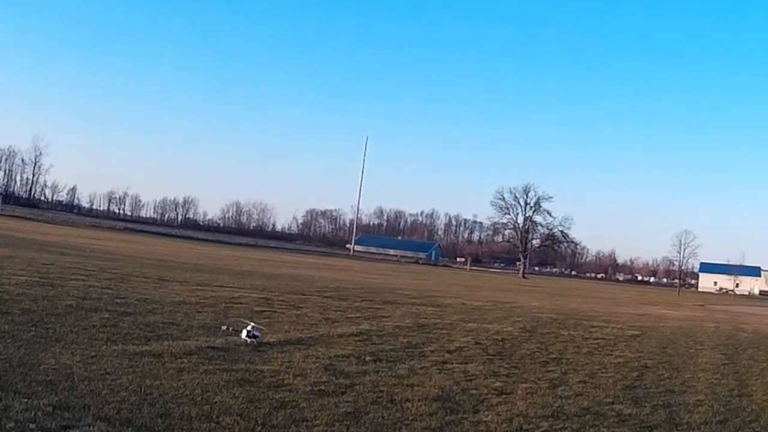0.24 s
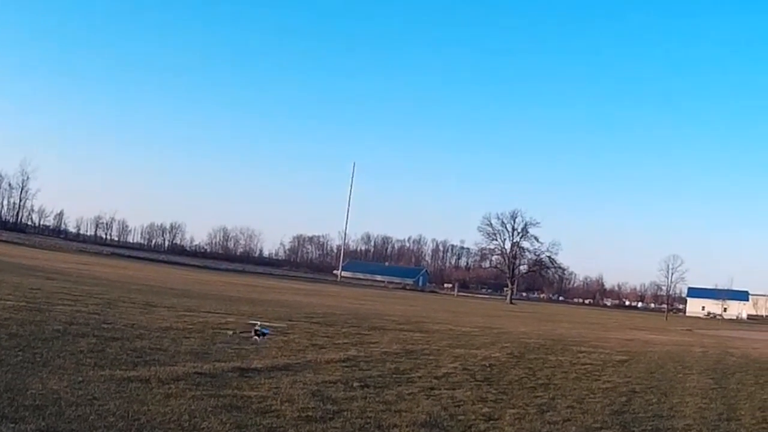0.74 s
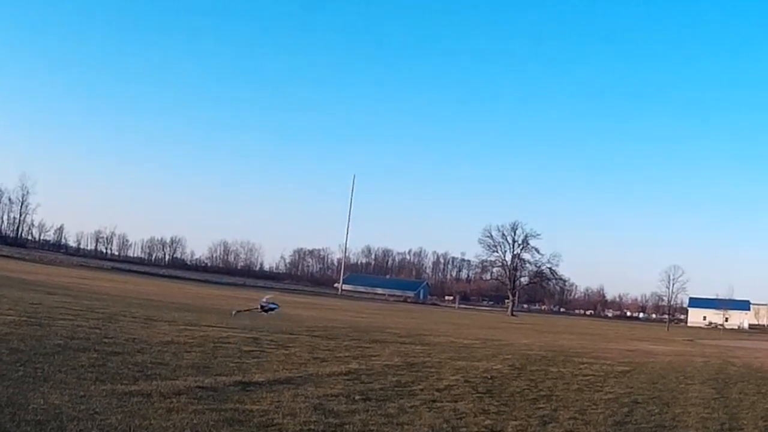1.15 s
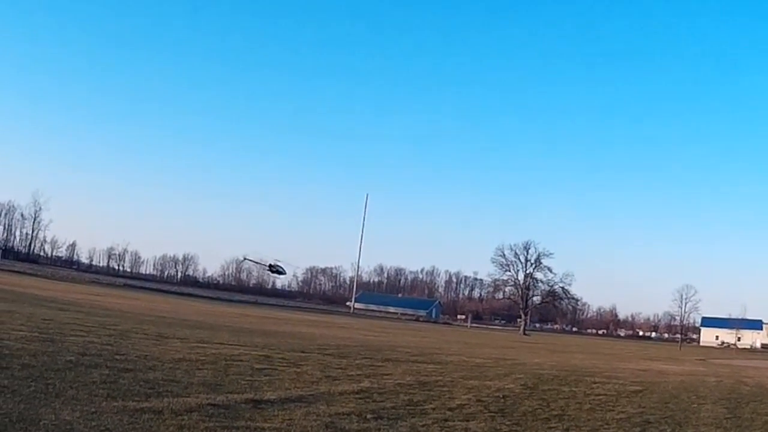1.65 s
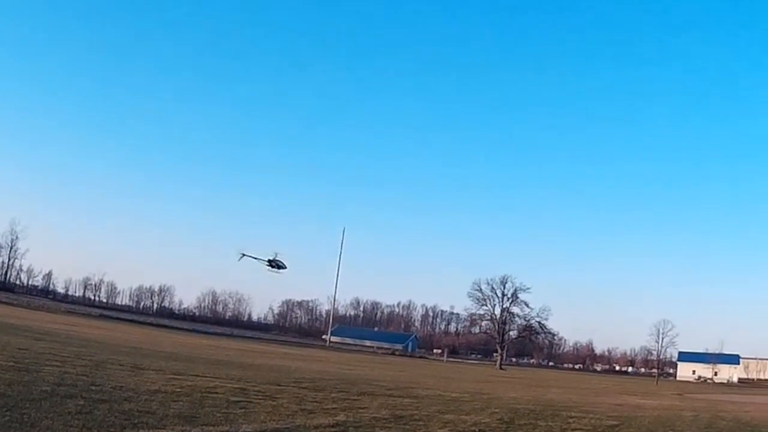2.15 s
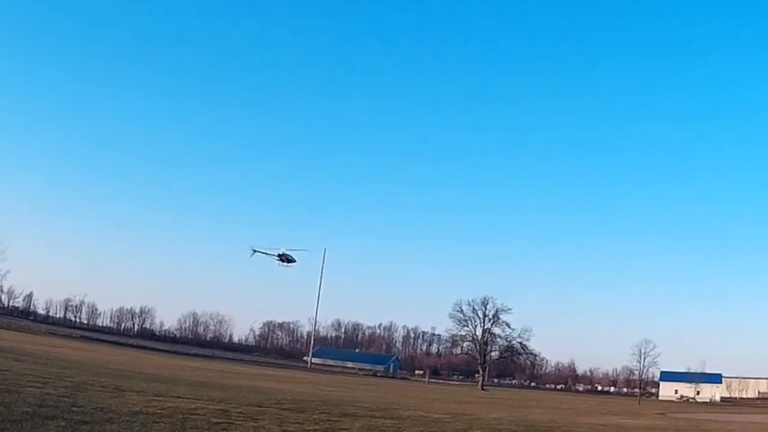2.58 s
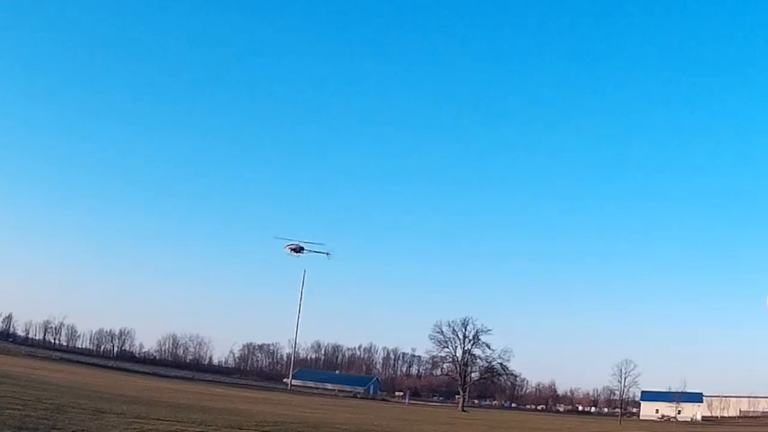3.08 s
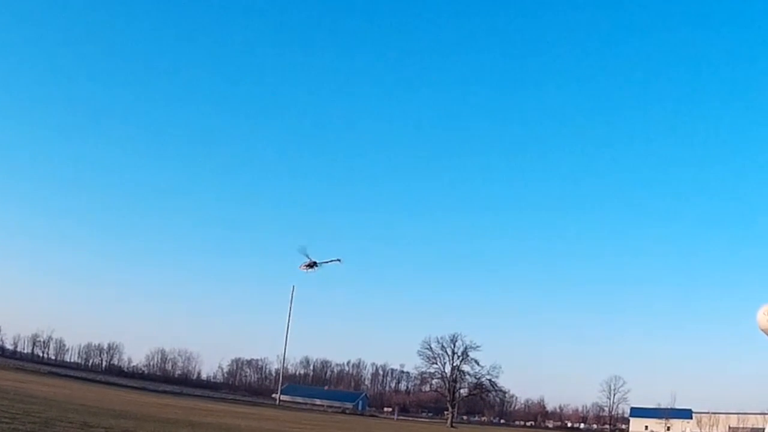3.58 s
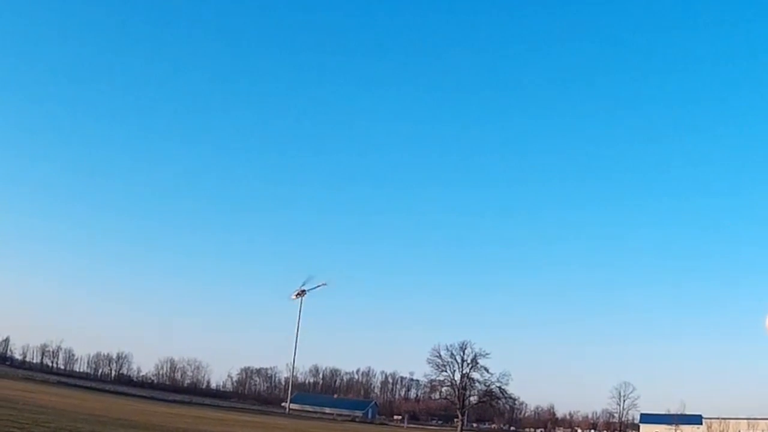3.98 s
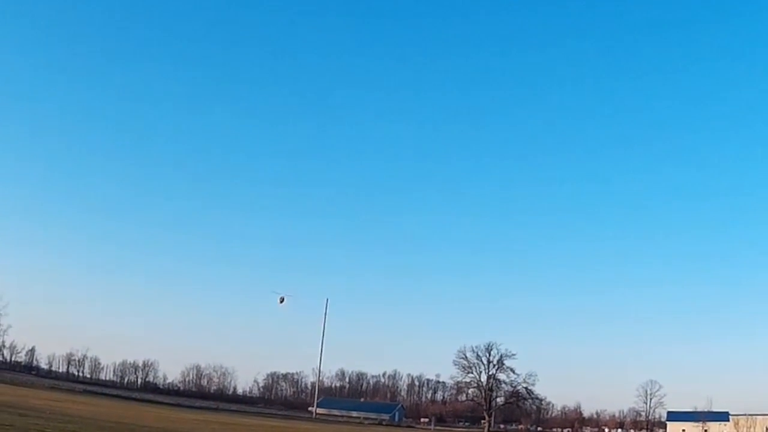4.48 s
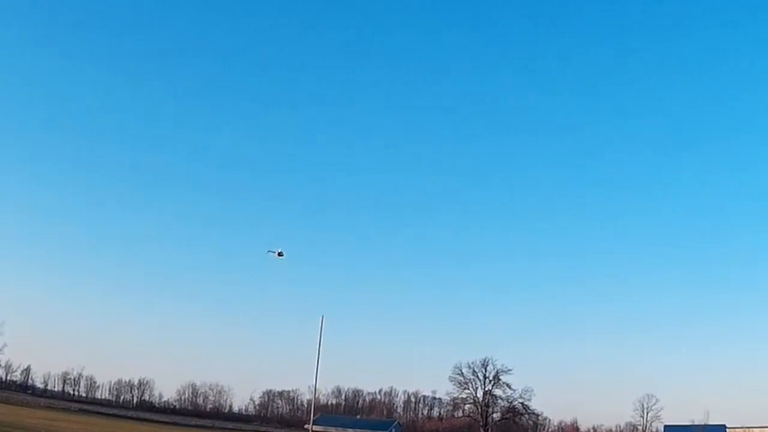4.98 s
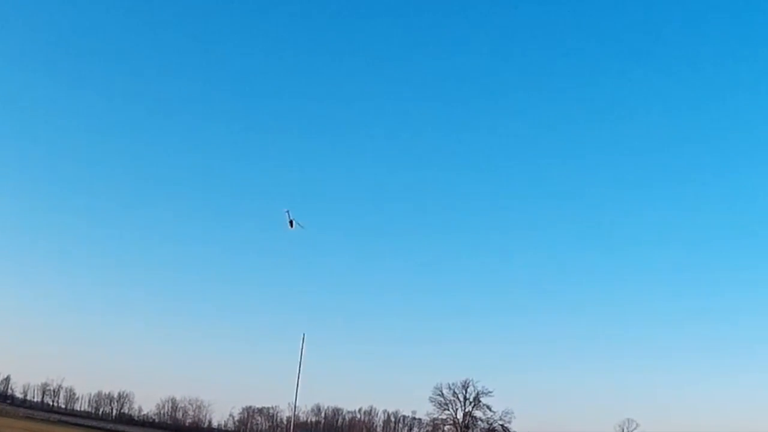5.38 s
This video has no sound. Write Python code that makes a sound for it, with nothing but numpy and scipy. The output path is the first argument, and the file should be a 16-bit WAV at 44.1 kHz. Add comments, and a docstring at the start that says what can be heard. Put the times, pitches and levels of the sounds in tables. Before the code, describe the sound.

Outdoors in an open field, a small electric model helicopter whines at a nearly steady mid pitch with fluttering blade buzz and gear sizzle. Its tone sweeps hollowly as it climbs. Around three seconds the pitch sags briefly with a harsh tail rasp, then recovers, swells in a bank and fades away. Light wind rumbles on a handheld camera microphone.

```python
"""Electric model helicopter over grass

A small electric helicopter lifts off a grass field, climbs, pirouettes and flies away.
One rotor shaft times it all: a whining drive, thrumming blades that chop whine and air, a humming tail, gears.
The tail rotor rasps when it pushes hard. A delayed ground bounce with a moving lag sweeps a comb through the sound.
Wind noise buffets the microphone, the field rushes faintly and the camera adds a thin whistle."""
import sys
import numpy as np
from scipy import signal
from scipy.fft import rfft, irfft
from scipy.io import wavfile
from scipy.ndimage import uniform_filter1d

SR = 44100
rng = np.random.default_rng(int(sys.argv[2]) if len(sys.argv) > 2 else 0)


def pcm_store(signal):
    """Save signal as 16-bit PCM."""
    levels = np.round(np.clip(np.atleast_2d(signal), -1, 1) * 32767)
    wavfile.write(sys.argv[1], SR, levels.astype(np.int16).T)


N = 248267
T = np.arange(N) / SR
WHINE_PER_TURN = 25  # whine cycles per turn of the main rotor

# aim of the sound as the body turns: (time [s], whine level [dB], gear level [dB])
FACING = [(0, 2, 1), (1.1, -.5, 0.5), (1.75, -2.5, 5.5), (2.4, -0.5, 5), (2.76, 1.5, 6), (2.89, -1.5, 3),
          (2.99, -12, -2), (3.08, -1.5, -3), (3.28, 0, 5), (3.6, -1, 7.5), (4.05, -1, 5), (4.3, 2.5, -1.5),
          (4.68, -2.5, 4.5), (5.0, -0.5, -1), (5.63, 0, 1.5)]


def undb(db):
    """Decibels to gain."""
    return 10 ** (np.asarray(db) / 20)


def curves(table):
    """Each column of a table, joined by straight lines in time."""
    time_s, *columns = np.transpose(table)
    return [np.interp(T, time_s, column) for column in columns]


def walk(rate_hz):
    """Smooth random motion of unit spread: noise rolled off steeply above rate_hz."""
    f = np.fft.rfftfreq(N, 1 / SR)
    x = irfft(rfft(rng.standard_normal(N)) / (1 + (f / rate_hz) ** 4), N)
    return x / x.std()


def noise(colour):
    """Noise of unit rms, its spectrum joined in dB over log frequency."""
    hz, db = np.transpose(colour)
    f = np.fft.rfftfreq(N, 1 / SR) + 1
    gain = undb(np.interp(np.log(f), np.log(hz), db))
    ends = np.minimum(f / hz[0], 1) ** 2 * np.minimum(hz[-1] / f, 1) ** 2
    x = irfft(rfft(rng.standard_normal(N)) * gain * ends, N)
    return x / x.std()


def swell(at_s, half_s, order=2):
    """A rise from 0 to 1 and back around a moment; higher orders hold the top."""
    return np.exp(-np.abs((T - at_s) / half_s) ** order)


def bank():
    """How far the rotor disc is tipped towards the listener, 0-1."""
    # banked turns: (middle [s], half length [s], depth [0-1])
    banks = [(3.614, 0.53, 1), (4.294, 0.16, 0.3), (5.3, 0.3, 0.23)]
    return sum(depth * swell(at_s, half_s, order=6) for at_s, half_s, depth in banks)


def lines(angle, table, waver_db, waver_hz):
    """Partials locked to a shaft, each wavering in level on its own."""
    out = 0
    for order, db in table:
        gain = undb(db + waver_db * walk(waver_hz))
        out = out + gain * np.cos(order * angle + rng.uniform(0, 2 * np.pi))
    return np.sqrt(2) * out


def chop(turn, depth):
    """A swell each time one of the two main blades passes; unit rms."""
    gate = np.exp(depth * (np.cos(turn) ** 2) ** 3)
    return gate / np.sqrt(np.mean(gate ** 2))


def over_grass(x, bounce, dull_hz):
    """Direct sound plus its later bounce off the ground, which swallows the treble."""
    # grows with height, shrinks with distance: (time [s], lag of the bounce [ms])
    ground_lag = [(0.0, 1.09), (0.5, 1.177), (1.0, 1.43), (1.5, 2.01), (2.0, 2.57), (2.5, 2.886),
                  (3.0, 3.044), (3.4, 3.176), (3.75, 2.99), (4.1, 2.854), (4.6, 2.62), (5.0, 2.95),
                  (5.3, 3.4), (5.63, 3.85)]
    lag_ms, = curves(ground_lag)
    soft = signal.sosfiltfilt(signal.butter(1, dull_hz, fs=SR, output="sos"), x)
    echo = np.interp(T - lag_ms / 1000, T, soft, left=0)
    return (x + bounce * echo) / np.sqrt(1 + bounce ** 2 / 2)


def whistle(sound, shut_db, open_db, depth_db):
    """The camera's electronic whistle, held down by its noise suppressor when the sound is quiet."""
    whistle_hz, flip_hz = 9515.5, 36.5
    level_db = 10 * np.log10(uniform_filter1d(sound ** 2, SR // 20) + 1e-12)
    shut = np.clip((open_db - level_db) / (open_db - shut_db), 0, 1)
    # the phase flips to and fro, which splits the even tone into a comb
    flip = np.tanh(12 * np.sin(2 * np.pi * flip_hz * T))
    return np.cos(2 * np.pi * whistle_hz * T + 1.4 * flip) * undb(-depth_db * shut)


def field():
    """Faint, far-off rush of the open field with a smooth hiss: coloured noise, barely wavering."""
    # far-off rush: (frequency [Hz], level [dB per Hz])
    field_colour = [(60, -28), (220, 8.5), (300, 10.5), (700, 10.5), (1500, -9.5), (3000, -16.5),
                    (6000, -34), (13000, -21.5), (14400, -20)]
    return undb(-63 + 0.29 * walk(2.7)) * noise(field_colour)


def breeze():
    """Low buffeting of the microphone: a light wind that swells and dies down, with short gusts."""
    # wind rumble: (frequency [Hz], level [dB per Hz])
    wind_colour = [(15, -25), (30, 2.5), (55, 2), (100, -0.5), (150, -6), (230, -13.5), (500, -18.5),
                   (1500, -60)]
    # gusts on the microphone: (time [s], peak level [dB])
    gust_peaks = [(.67, -53), (.85, -51), (1.04, -52), (1.14, -53), (1.68, -51), (1.88, -50.5), (2.13, -67),
                  (2.33, -68), (2.55, -54), (4.42, -59), (4.55, -67)]
    gust_half_s = 0.034
    light = undb(-65.5 + 7.5 * swell(at_s=1.8, half_s=1.6) + 2.6 * walk(9.4))
    gusts = sum(undb(db) * swell(at_s, gust_half_s) for at_s, db in gust_peaks)
    return np.hypot(light, gusts) * noise(wind_colour)


def gears(turn, hiss_db):
    """Tooth tones with a little backlash, a sizzle that pulses with the rotor, and smooth hiss."""
    # gear teeth: (multiple of the rotor's turn, level [dB])
    teeth = [(179.7, -1), (187.5, -5), (200, -2), (212, -1)]
    # shrill teeth chopped by the blades: (multiple of the rotor's turn, level [dB])
    teeth_chopped = [(298, -7), (304, -7), (306, -6), (310, -4), (314, -8), (316, -6), (320, -1), (323, -5),
                     (327, -6), (335, -5)]
    # rasp, sizzle and hiss of the machinery: (frequency [Hz], level [dB per Hz])
    rasp_colour = [(3500, -10.5), (3850, -5.5), (4150, 1.5), (4750, 0), (4900, -19), (5100, -3),
                   (5600, -21)]
    sizzle_colour = [(5800, -11), (6500, -15), (6800, 3), (7350, -4), (7700, -2), (8100, -40), (9500, -50)]
    hiss_colour = [(2500, 9.5), (3400, -1.5), (4800, -5), (5400, 6), (6200, 1), (6450, -12.5), (8050, 0),
                   (8450, 5.5), (8900, -0.5), (10300, 1), (11000, 2.5), (11800, -1.5), (13100, -0.5),
                   (14400, -16)]
    # the main gear bites as the blades take load: (time [s], half length [s], rise [dB])
    gear_bites = [(1.13, 0.078, 5), (1.32, 0.053, 7), (2.695, 0.084, 4.5)]

    _, facing_db = curves(FACING)
    rasp_db = 1 + sum(db * swell(at_s, half_s) for at_s, half_s, db in gear_bites)
    slack = turn + 0.0011 * walk(23)  # backlash [rad]
    sizzle = undb(-10.5) * lines(slack, teeth_chopped, waver_db=4.0, waver_hz=2.0)
    sizzle += undb(-2.0) * noise(sizzle_colour) * chop(turn, depth=0.31)
    rasp = undb(-10.0) * lines(slack, teeth, waver_db=3.0, waver_hz=7.4) + noise(rasp_colour)
    hiss = undb(6.5) * noise(hiss_colour)
    return undb(hiss_db) * (undb(facing_db) * sizzle + undb(rasp_db) * rasp + hiss)


def tail_rotor(turn, rush_db, hiss_db):
    """A hum that turns to a rasp when the tail pushes hard; the main rotor's wake shakes it."""
    # hum: (time [s], level [dB])
    tail_hum = [(0, -57.5), (1.25, -60), (1.7, -77), (2.1, -75), (2.7, -69.5), (3.3, -61), (3.55, -67.5),
                (4.05, -62), (4.4, -69), (5.18, -59.5), (5.6, -70.5)]
    # hard pushes: (time [s], half length [s], rasp level [dB])
    tail_kicks = [(1.549, 0.15, -57.5), (2.877, 0.06, -52), (2.973, 0.055, -49.5), (3.13, 0.032, -57),
                  (3.332, 0.057, -60.5), (3.92, .17, -68)]
    # tail blade pulses under load: (harmonic, level [dB])
    tail_rasp = [(2, 1), (3, -4), (4, -7), (5, -10), (6, -10), (7, -20)]
    tail_per_turn = 16.26  # hum cycles per turn of the main rotor
    octave_over_hiss_db, rasp_over_rush_db = 13.5, -12.5

    hum_db, = curves(tail_hum)
    push = sum(undb(db) * swell(at_s, half_s) for at_s, half_s, db in tail_kicks)
    angle = tail_per_turn * turn
    shake = 0.45 * walk(37)  # [rad]
    hum = (undb(hum_db + walk(6.8)) + undb(-9.5) * push) * np.cos(angle + shake / 2)
    octave = undb(hiss_db + octave_over_hiss_db) + undb(-4) * push
    hum += octave * (1 + 0.3 * walk(25)) * np.cos(2 * (angle + shake))
    rasp = lines(angle + shake / 4, tail_rasp, waver_db=2, waver_hz=22)
    rasp += undb(3.5) * np.cos(angle + WHINE_PER_TURN * turn)  # the tail blades also chop the whine
    return np.sqrt(2) * hum + np.hypot(push, undb(rush_db + rasp_over_rush_db)) * rasp


def main_rotor(turn, rush_db, hiss_db):
    """Blades thrum, slap in the bank, chop the drive's sound into a buzz and shed air in puffs."""
    # blade pulses: (multiple of the rotor's turn, level [dB])
    blade_pulses = [(4, -1), (10, -7), (12, 0), (14, -9), (16, -3)]
    # lines of the drive chopped by the blades, low and high: (multiple of the rotor's turn, level [dB])
    buzz_low = [(21, -11), (28, -8), (31, -4), (33, -7), (35, -10), (37, -12), (39, -17), (41, -16),
                (44, -14), (46, -8), (48, -10), (54, -12)]
    buzz_high = [(65, -17), (67, -15), (69, -16), (71, -14), (73, -13), (77, -11), (79, -11), (81, -11),
                 (83, -17), (90, -13), (92, -15), (106, -17), (121, -22), (125, -22)]
    # air shed by the blades, low and high: (frequency [Hz], level [dB per Hz])
    wash_colour = [(120, -3), (280, -18.5), (420, -6.5), (560, -8), (750, 3.5), (900, -7.5), (1100, -10.5),
                   (1400, -13.5), (2500, -54)]
    swish_colour = [(600, 10), (1000, -7), (1350, -3.5), (1800, 2.5), (2150, 3.5), (2450, -10),
                    (2800, -17.5), (3300, -33), (4500, -41)]
    wash_over_hiss_db, rush_over_hiss_db = 18.5, 13
    wash_follow = 0.59  # share by which the wash follows the rush instead of the hiss
    bank_slap_db, bank_wash_db = 14, 2  # rises in a full bank

    thrum = undb(-73.5) * lines(turn, blade_pulses[:1], waver_db=1.5, waver_hz=11)
    slap_gain = undb(-79 + bank_slap_db * bank())
    slap = slap_gain * lines(turn, blade_pulses[1:], waver_db=4.5, waver_hz=15)
    wash = undb(-6.0) * lines(turn, buzz_low, waver_db=3.0, waver_hz=3.5)
    wash += undb(-3.5) * noise(wash_colour) * chop(turn, depth=0.096)
    swish = undb(-4.5) * lines(turn, buzz_high, waver_db=4.0, waver_hz=5.9) * chop(turn, depth=0.37)
    swish += undb(0.73) * noise(swish_colour) * chop(turn, depth=1.05)
    wash_db = hiss_db + wash_over_hiss_db + bank_wash_db * bank()
    wash_db += wash_follow * (rush_db - hiss_db - rush_over_hiss_db)
    air = undb(wash_db) * wash + undb(rush_db) * swish
    return thrum + slap + over_grass(air, bounce=0.39, dull_hz=4200)


def drive(turn, whine_hz, hiss_db):
    """Whine with harmonics and blade-rate sidebands, combed by the ground bounce; shrill overtones on top."""
    # (harmonic of the whine, offset [blade rates], level over the hiss [dB], rise in a full bank [dB])
    drive_lines = [(1, -1, 13, 6), (1, 1, 13.5, 7.5), (1, 2, 10.5, 3.5), (2, 0, 10.5, 1.5), (2, 1, 13.5, 1),
                   (3, 0, 6, -1), (4, 0, 2.5, 13.5)]
    # the motor's shrill overtones: (harmonic, level over the hiss [dB], share of the gears' facing)
    shrill_lines = [(11, -13.5, 1.5), (12, -9.5, 0.19), (13, -4.5, 1.2)]
    frame_ring_hz, frame_width_hz, frame_ring_db = 5950, 110, 7

    whine_db, gears_db = curves(FACING)
    angle = WHINE_PER_TURN * turn
    tone = undb(32.5) * (1 + 0.027 * walk(37)) * np.cos(angle)  # fundamental, over the hiss
    for k, blades, db, bank_db in drive_lines:
        gain = undb(db + bank_db * bank() + 1.73 * walk(13))
        # two blades pass per turn
        tone += gain * np.cos(k * angle + 2 * blades * turn + rng.uniform(0, 2 * np.pi))
    tone = undb(whine_db) * over_grass(tone, bounce=1.0, dull_hz=1420)
    # the shrill overtones flutter with each blade and blur with the backlash
    slack = angle + 0.055 * walk(35)
    for k, db, share in shrill_lines:
        # each swells as it slides through a resonance of the frame
        ring_db = frame_ring_db / (1 + ((k * whine_hz - frame_ring_hz) / frame_width_hz) ** 2)
        gain = undb(db + share * gears_db + ring_db + 1.6 * walk(4.7))
        tone += gain * np.cos(k * slack) * chop(turn, depth=0.45)
    return np.sqrt(2) * undb(hiss_db) * tone


def scene():
    """One rotor shaft times every part of the helicopter; breeze and field lie under it."""
    # the motor hunts a little and sags in the pirouette: (time [s], pitch of the whine [Hz])
    speed = [(0, 568), (.6, 568.7), (.7, 565), (.86, 568.8), (1.1, 566.3), (1.3, 570.2), (1.5, 568),
             (1.58, 561.5), (1.68, 568.7), (1.86, 567), (2.15, 570.6), (2.66, 570.8), (2.82, 563),
             (3.0, 523.5), (3.16, 534.7), (3.6, 564), (3.98, 564.8), (4.16, 555.5), (4.5, 562),
             (4.78, 556.7), (4.96, 567), (5.46, 571.2), (5.63, 575.7)]
    # most parts follow these two: (time [s], blades' rush level [dB], machinery's hiss level [dB])
    levels = [(0.03, -53.5, -69.5), (0.07, -53.5, -68.5), (0.4, -52.5, -69), (1.02, -55, -69),
              (1.35, -52, -70), (1.42, -55, -69), (1.95, -53, -69), (2.05, -61, -77), (2.47, -60.5, -75),
              (2.63, -53, -69.5), (2.85, -55, -69), (2.96, -51.5, -70), (3.07, -62.5, -75.5),
              (3.13, -54.5, -74.5), (3.16, -61, -77), (3.74, -53.5, -69.5), (3.78, -53.5, -71.5),
              (4.06, -57.5, -71), (4.17, -65, -80), (4.78, -73.5, -82), (4.98, -69, -81),
              (5.27, -59.5, -74.5), (5.6, -58.5, -73)]
    whine_hz, = curves(speed)
    rush_db, hiss_db = curves(levels)
    unsteady_hz = whine_hz * (1 + 0.000701 * walk(12.1))
    turn = 2 * np.pi * np.cumsum(unsteady_hz) / WHINE_PER_TURN / SR  # rotor angle [rad]
    small_parts = tail_rotor(turn, rush_db, hiss_db) + gears(turn, hiss_db)
    helicopter = over_grass(small_parts, bounce=0.29, dull_hz=3380)
    helicopter += main_rotor(turn, rush_db, hiss_db) + drive(turn, whine_hz, hiss_db)
    return (field() + breeze() + helicopter)[None]


def record(dry):
    """The camera adds its whistle and cuts the top."""
    top_hz = 14200
    sound = dry + undb(-66.5) * whistle(dry[0], shut_db=-49, open_db=-38.5, depth_db=9.0)
    return signal.sosfilt(signal.ellip(8, .2, 70, top_hz, fs=SR, output="sos"), sound)


dry = scene()
out = record(dry)
pcm_store(out)
```